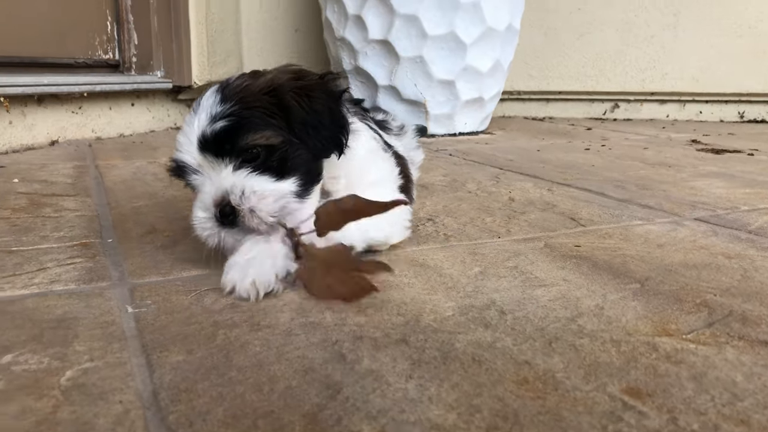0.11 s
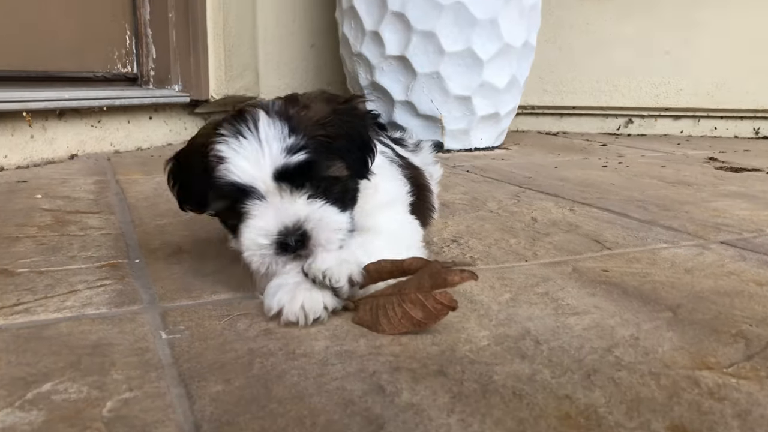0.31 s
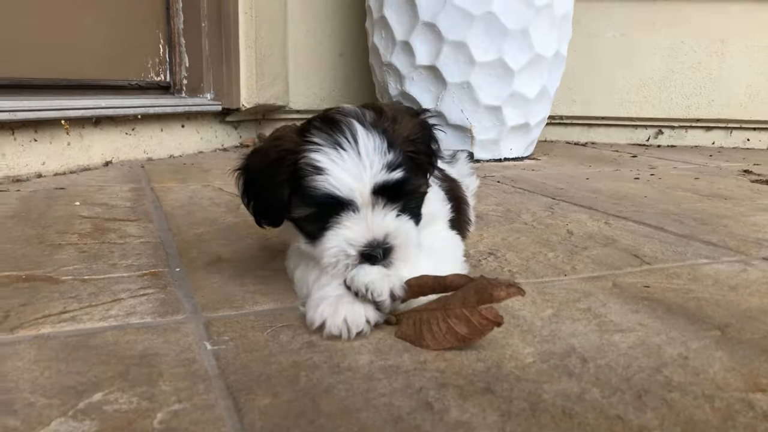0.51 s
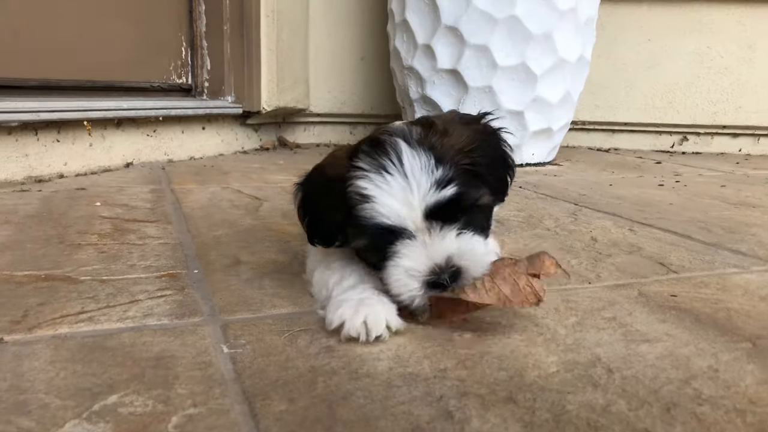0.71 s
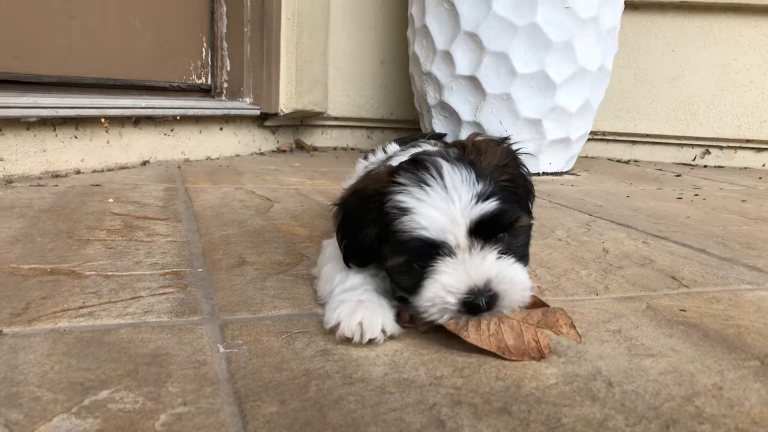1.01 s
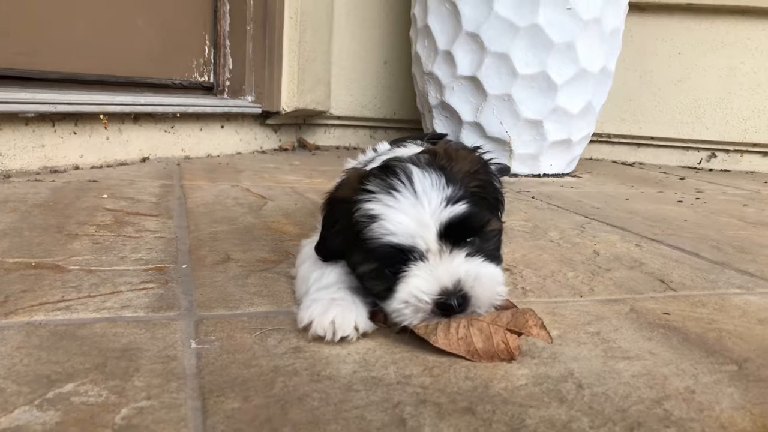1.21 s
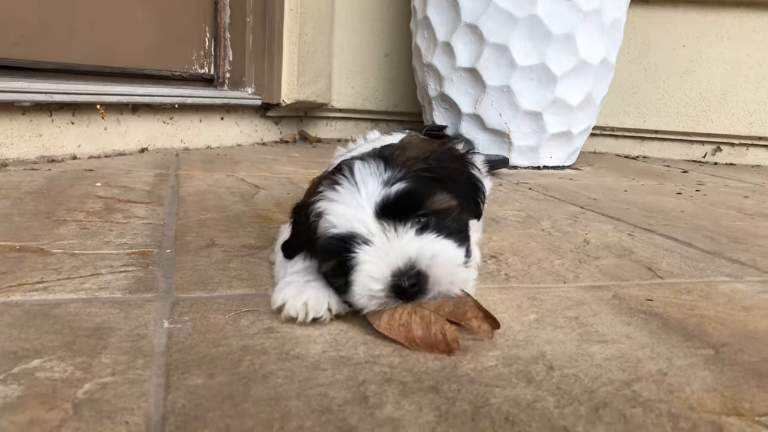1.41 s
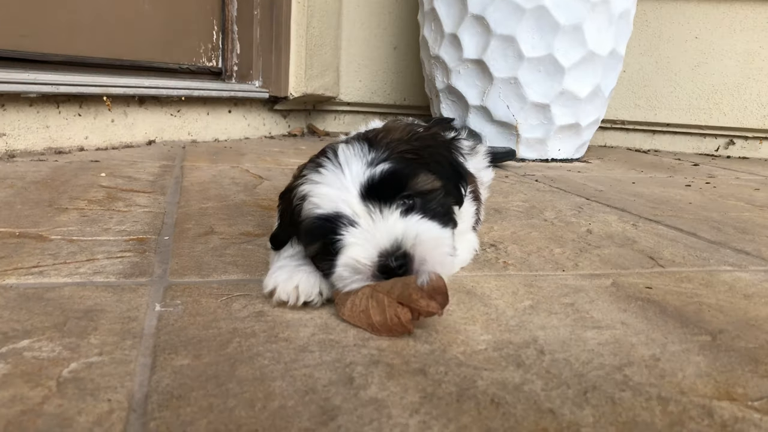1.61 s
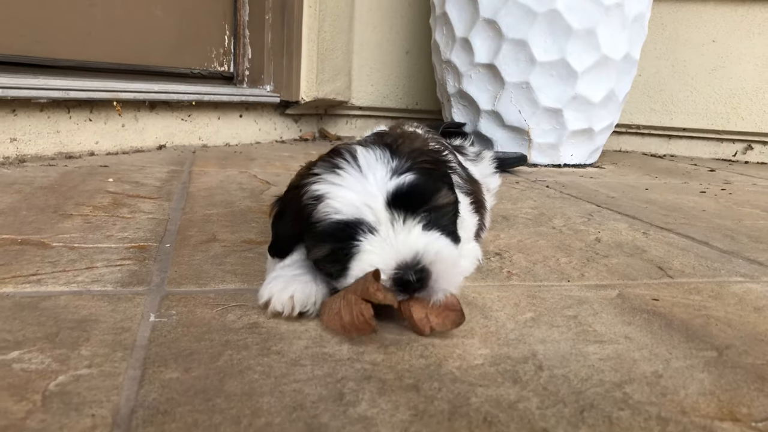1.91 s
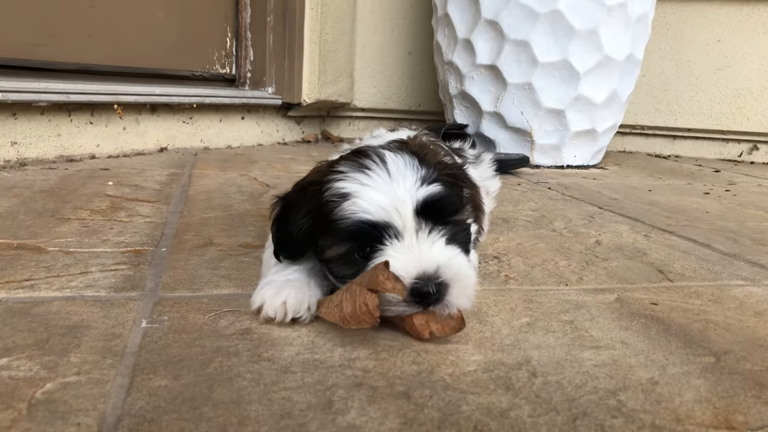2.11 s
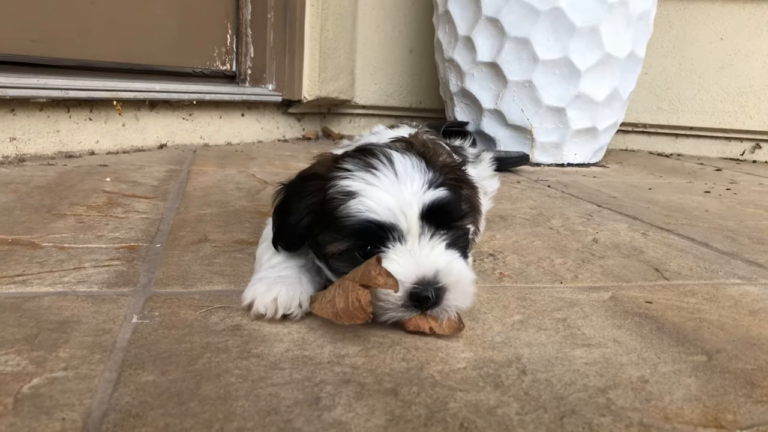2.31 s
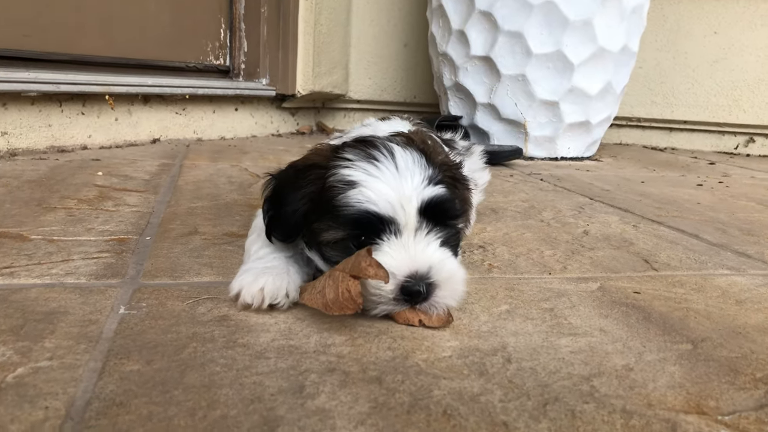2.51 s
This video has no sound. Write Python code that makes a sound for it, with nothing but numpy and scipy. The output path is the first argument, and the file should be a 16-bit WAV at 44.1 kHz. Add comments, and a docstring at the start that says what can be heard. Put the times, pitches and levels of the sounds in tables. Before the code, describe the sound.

Close-up brittle leaf crunches come in bursts, busiest midway, then softer tooth nibbles and a late sharp tick; short porch echo, faint bird chirps, and constant outdoor rumble and hiss with a thin high whine.

```python
"""A puppy chews a dry leaf on a stone porch, heard close up, over low rumble and a high hiss with a fine whine.
First the leaf snaps in clusters (noise bursts through brief resonances), with swells of rustle (rough grains)
and hollow rib knocks (decaying sines). Small crinkles join while the jaw works, then distant bird whistles
(gliding sines). Soft mouth ticks and teeth catching on the leaf (shorter bursts) come in towards the end.
The close sounds get a short echo from floor and wall; the bird has its own; a low-pass shuts off the top.
"""
import sys
import numpy as np
from scipy import signal
from scipy.fft import rfft, irfft, next_fast_len
from scipy.io import wavfile
from scipy.ndimage import uniform_filter1d

SR = 44100
rng = np.random.default_rng(int(sys.argv[2]) if len(sys.argv) > 2 else 0)


def store_pcm(level_fs):
    """Save levels as 16-bit WAV."""
    pcm = np.round(np.clip(level_fs, -1, 1) * 32767).astype(np.int16)
    wavfile.write(sys.argv[1], SR, np.atleast_2d(pcm).T)


N = 116865  # length in samples

LOW_HZ, MID_HZ, HIGH_HZ = 437, 2360, 5400  # lower edges of the three crack bands
LEVEL_WINDOW_S = 0.003  # crack and knock levels are the rms of their energy spread over this time


def undb(db):
    """Decibels to gain."""
    return 10 ** (np.asarray(db) / 20)


def unit(x):
    """Scale to unit energy."""
    return x / np.sqrt(np.sum(x ** 2) + 1e-18)


def level(x, db):
    """Scale to an rms level."""
    return unit(x) * np.sqrt(len(x)) * undb(db)


def add(out, start, x):
    """Mix a sound in at a time in seconds."""
    i = max(int(start * SR), 0)
    out[i:i + len(x)] += x[:max(len(out) - i, 0)]


def ring_down(t, t60):
    """Exponential decay that falls by 60 dB in t60 seconds."""
    return np.exp(-np.log(1000) * t / t60)


def colour(x, points):
    """Causal (minimum-phase) EQ through (f/Hz, level/dB) points, built by folding the cepstrum."""
    hz, db = np.array(points).T
    size = next_fast_len(len(x) + 4096)
    log_hz = np.log(np.fft.rfftfreq(size, 1 / SR) + 1)
    log_gain = np.interp(log_hz, np.log(hz), np.log(undb(db)))
    cepstrum = irfft(log_gain, size)
    cepstrum[1:size // 2] *= 2
    cepstrum[size // 2 + 1:] = 0
    return irfft(rfft(x, size) * np.exp(rfft(cepstrum)), size)[:len(x)]


WHINE_WAVER_DB, WHINE_WAVER_S = 2.5, 0.45  # spread of the drift, time between its knots


def waver(t):
    """Slow random drift of a level."""
    knots = np.arange(0, t[-1] + WHINE_WAVER_S, WHINE_WAVER_S)
    return undb(WHINE_WAVER_DB * np.interp(t, knots, rng.standard_normal(len(knots))))


# spectral shape of the outdoor rumble and hiss (f/Hz, relative level/dB)
AIR = [(20, -23), (50, -2.5), (130, -4.5), (220, -5), (400, -9), (650, -10.5), (1100, -21), (2200, -23),
       (4600, -27), (6200, -25), (11000, -18), (12500, -37.5), (15500, -36)]
AIR_DB = -51.5
# strongest lines of the whine, each drifting around its level (f/Hz, level/dB)
WHINE_LINES = [(6156, -67.5), (7098, -67), (7678, -66.5), (9625, -66)]
WHINE_SPACING_HZ, WHINE_LOW_HZ, WHINE_TOP_HZ = 71.7, 5440, 11100
WHINE_DB, WHINE_SCATTER_DB = -56.5, 2  # level of the whole comb, scale of its uneven lines


def background():
    """Steady rumble and hiss from shaped noise; the hiss holds a fine whine of closely spaced lines."""
    t = np.arange(N) / SR
    air = level(colour(rng.standard_normal(N), AIR), AIR_DB)
    hz = WHINE_SPACING_HZ * np.arange(1, 200)
    size = undb(WHINE_SCATTER_DB * rng.uniform(-0.52, 0.76, len(hz)))
    size = size * (hz > WHINE_LOW_HZ) * (hz < WHINE_TOP_HZ)
    lines = np.zeros(N // 2 + 1, complex)
    lines[np.round(hz * N / SR).astype(int)] = size * np.exp(2j * np.pi * rng.random(len(hz)))
    strong = np.zeros(N)
    for f, db in WHINE_LINES:
        amplitude = np.sqrt(2) * undb(db) * waver(t)
        strong += amplitude * np.sin(2 * np.pi * (f * t + rng.random()))
    return air + level(irfft(lines, N), WHINE_DB) + strong


# colour of a crack before its bands are levelled (f/Hz, relative level/dB)
CRACK_COLOUR = [(200, -2), (560, 2.5), (760, -3), (980, 1), (1500, 6), (3400, 3), (5200, -3.5), (7000, -2),
                (8200, -5), (9800, 1.5), (12500, -5), (15500, -4.5)]


def body(modes, ring_db, stretch):
    """Response of a thin object: the crack itself and its brief resonances, all shifted in pitch by stretch."""
    t = np.arange(1024) / SR
    ring = np.zeros(len(t))
    for hz, t60, db in modes:
        ring += undb(db) * np.cos(2 * np.pi * hz * stretch * t) * ring_down(t, t60)
    click = t == 0
    return colour(click + undb(ring_db) * unit(ring), CRACK_COLOUR)


CRACK_RISE_S, CRACK_PEAK_S = 0.00051, 0.00072  # rise time constant; onset to strongest fracture
LEAD_S = 0.003  # room for the rise ahead of the onset
FIBRE_SCATTER_DB, PITCH_SPREAD = 4.5, 0.08  # spread of fibre strength; of log resonance pitch


def cracks(rows, decay_s, modes, ring_db):
    """A quick avalanche of breaking fibres; resonances shift at random in pitch from crack to crack."""
    out = np.zeros(N)
    t = np.arange(1024) / SR - LEAD_S - CRACK_PEAK_S
    bands = [signal.butter(2, [LOW_HZ, MID_HZ], "band", fs=SR, output="sos"),
             signal.butter(3, [MID_HZ, HIGH_HZ], "band", fs=SR, output="sos"),
             signal.butter(4, HIGH_HZ, "high", fs=SR, output="sos")]
    envelope = np.exp(-np.maximum(-t / CRACK_RISE_S, t / decay_s))
    for start, *band_db in rows:
        push, size = rng.standard_normal((2, len(t)))
        response = body(modes, ring_db, np.exp(PITCH_SPREAD * rng.standard_normal()))
        fibres = push * undb(FIBRE_SCATTER_DB * size) * envelope
        burst = signal.fftconvolve(fibres, response)[:len(t)]
        parts = [undb(db) * unit(signal.sosfilt(band, burst)) for band, db in zip(bands, band_db)]
        add(out, start - LEAD_S, np.sqrt(LEVEL_WINDOW_S * SR) * sum(parts))
    return out


# brittle leaf snaps (t/s, low band level/dB, middle band level/dB, high band level/dB)
SNAPS = [(0.0554, -49.5, -44, -47), (0.2381, -31, -31.5, -33), (0.239, -32.5, -27.5, -27.5),
         (0.2554, -47, -18, -21.5), (0.2574, -34, -21, -24), (0.2594, -29, -26, -22),
         (0.2878, -39.5, -39, -57), (0.3176, -32.5, -37.5, -56), (0.7363, -30.5, -27.5, -36.5),
         (0.7471, -30, -56, -39), (0.7588, -42, -41, -45), (0.7878, -54, -47, -30.5),
         (0.8282, -41, -58, -64), (0.957, -47, -49, -48), (0.971, -36.5, -34, -39), (0.9908, -43, -30, -29),
         (0.9998, -30.5, -33, -28), (1.0046, -34, -26.5, -30.5), (1.0113, -29, -21, -17),
         (1.0585, -40.5, -30, -36), (1.1666, -42, -65, -70), (1.2135, -63, -45, -41.5),
         (1.2744, -43.5, -37, -37.5), (1.2994, -38.5, -33.5, -37), (1.3051, -37, -36, -44),
         (1.3359, -41, -29.5, -26), (1.3376, -37.5, -31.5, -31), (1.3506, -38, -37, -26.5),
         (1.354, -38, -25, -26.5), (1.356, -41, -26.5, -42), (1.3652, -53, -33, -37),
         (1.3904, -36.5, -23, -21.5), (1.3934, -34.5, -21, -37), (1.4097, -44, -29.5, -31),
         (1.4168, -35.5, -42, -43), (1.4263, -36, -28.5, -29.5), (1.4438, -46, -49, -56),
         (1.4583, -26, -18.5, -20), (1.46, -27.5, -35, -40), (1.4722, -56, -28, -36),
         (1.4861, -42, -25.5, -24), (1.4963, -34, -26, -29), (1.5273, -25.5, -32, -29.5),
         (1.5309, -45, -28, -31), (1.6147, -36, -28, -30)]
# leaf resonances before the random pitch shift (f/Hz, t60/s, relative level/dB)
LEAF = [(980, 0.008, -20), (1400, 0.031, -10), (2280, 0.0089, -9), (3330, 0.0051, -8.5), (3660, 0.011, 2.5),
        (7330, 0.0041, 2)]
SNAP_DECAY_S = 0.0013  # time constant


def snaps():
    """The brittle leaf breaks: crack bursts ringing through the leaf's own resonances."""
    return cracks(SNAPS, SNAP_DECAY_S, LEAF, ring_db=-6.0)


# swells as the leaf bends or scrapes on the stone
# (peak t/s, rise time constant/s, decay time constant/s, level at the peak before treble gain/dB, treble gain/dB)
RUSTLES = [(0.263, 0.0055, 0.0076, -28, 1.5), (0.334, 0.01, 0.013, -33.5, 7),
           (.685, 0.008, 0.0058, -40.5, 4), (0.711, 0.003, 0.0051, -46, 14),
           (0.749, 0.0042, 0.0062, -35.5, 1), (0.794, 0.0041, 0.0019, -32, 10),
           (0.829, 0.0095, .005, -39.5, -22), (1.015, 0.01, 0.014, -39, 11),
           (1.347, 0.0057, 0.024, -36.5, 9), (1.484, 0.018, 0.01, -36.5, 12),
           (1.534, 0.013, 0.0062, -42, 7), (1.603, 0.0016, 0.015, -37.5, 7),
           (1.673, 0.0065, 0.0059, -37.5, 5.5), (2.042, 0.019, 0.014, -37.5, 1),
           (2.21, 0.0059, 0.0083, -43, 6), (2.335, 0.0091, 0.032, -63, 24)]
# colour of the rustle (f/Hz, relative level/dB)
RUSTLE_COLOUR = [(100, -15), (760, -3), (980, 2), (1600, 2), (2500, 0.5), (3400, -0.5), (5200, -8.5),
                 (7000, -12), (10000, -14), (15500, -22.5)]
RUSTLE_SCATTER_DB = 5.5  # spread of grain strength


def rustle():
    """Dense tiny fractures swell and die away as the leaf is bent and dragged."""
    t = np.arange(N) / SR
    size = np.repeat(rng.standard_normal(N // 24 + 1), 24)[:N]  # each strength held for 24 samples
    rough = rng.standard_normal(N) * undb(RUSTLE_SCATTER_DB * size)
    grains = level(colour(rough, RUSTLE_COLOUR), 0)
    dull = signal.sosfiltfilt(signal.butter(2, HIGH_HZ, fs=SR, output="sos"), grains)
    out = np.zeros(N)
    for peak, rise, decay, db, treble_db in RUSTLES:
        envelope = np.exp(-np.maximum((peak - t) / rise, (t - peak) / decay))
        out += undb(db) * envelope * (dull + undb(treble_db) * (grains - dull))
    return out


# a stiff rib of the leaf gives way with a hollow knock (t/s, f/Hz, level/dB)
KNOCKS = [(0.2574, 594, -32), (1.528, 980, -41.5), (2.3128, 1243, -32)]
KNOCK_T60_S = 0.021


def knocks():
    """A rib that gives way rings briefly at one pitch."""
    out, t = np.zeros(N), np.arange(N) / SR
    for start, hz, db in KNOCKS:
        ring = np.sin(2 * np.pi * hz * t) * ring_down(t, KNOCK_T60_S)
        add(out, start, np.sqrt(LEVEL_WINDOW_S * SR) * undb(db) * unit(ring))
    return out


# spells in which the jaw works (start t/s, end t/s)
CHEWS = [(.68, .83), (1.16, 1.55), (1.6, 1.69), (1.94, 2.08)]
# resonances of the mouth closed on the leaf before the random pitch shift, also used by ticks and bites
# (f/Hz, t60/s, relative level/dB)
MOUTH = [(1420, 0.011, -3), (3430, 0.01, -7)]
CRINKLES_PER_S, CRINKLE_DB, CRINKLE_SPREAD_DB = 55, -44, 2.5
CRINKLE_EDGE_DB = -9.5  # low and high bands against the middle


def crinkles():
    """Small stray cracks at random moments while the jaw works, each with its own colour."""
    slots = np.arange(0, N / SR, LEVEL_WINDOW_S)
    chance, scatter = rng.random((len(slots), 2)), rng.standard_normal((len(slots), 4))
    chewing = sum((slots > start) & (slots < end) for start, end in CHEWS)
    happens = chance[:, 0] < chewing * CRINKLES_PER_S * LEVEL_WINDOW_S
    # one draw shared by all bands plus one per band
    spread_db = CRINKLE_SPREAD_DB * (scatter[:, :1] + scatter[:, 1:]) / np.sqrt(2)
    band_db = CRINKLE_DB + CRINKLE_EDGE_DB * np.array([1, 0, 1]) + spread_db
    times = slots + chance[:, 1] * LEVEL_WINDOW_S
    rows = np.column_stack([times, band_db])[happens]
    return cracks(rows, SNAP_DECAY_S, MOUTH, ring_db=-15)


# bird whistles (start t/s, length/s, first f/Hz, f it settles towards/Hz, level at the crest/dB, flutter/Hz)
WHISTLES = [(0.811, .38, 3464, 3685, -55, 14), (2.044, 0.096, 4820, 4750, -52.5, 100),
            (2.212, 0.107, 4440, 4220, -47.5, 35), (2.3, .21, 3380, 3110, -61, 42)]
GLIDE_RATE, SWELL_SKEW = 2.5, 0.6  # glide decay per whistle length; below 1 the swell crests early
FLUTTER_S = 0.004  # smoothing of the pitch flutter
BIRD_ECHO_DB, BIRD_T60_S = -10, 0.22


def bird():
    """Distant whistles swell early and fade slowly; each glides, flutters a little and levels off."""
    out, t = np.zeros(N), np.arange(SR) / SR
    for start, length, first_hz, last_hz, db, flutter_hz in WHISTLES:
        u = np.linspace(0, 1, int(length * SR))
        smooth = uniform_filter1d(rng.standard_normal(SR), int(FLUTTER_S * SR))
        flutter = level(smooth, 0)[:len(u)]
        hz = last_hz + (first_hz - last_hz) * np.exp(-GLIDE_RATE * u) + flutter_hz * flutter
        swell = np.sin(np.pi * u ** SWELL_SKEW) ** 2
        add(out, start, np.sqrt(2) * undb(db) * swell * np.sin(2 * np.pi * np.cumsum(hz) / SR))
    tail = unit(rng.standard_normal(SR) * ring_down(t, BIRD_T60_S))
    return out + undb(BIRD_ECHO_DB) * signal.fftconvolve(out, tail)[:N]


def with_middle(rows, middle_db):
    """Give each (t/s, low/dB, high/dB) row a middle band offset from the mean of the other two."""
    return [(start, low, (low + high) / 2 + middle_db, high) for start, low, high in rows]


# sharp mouth ticks, plus one leaf pop at 2.3118 s beside the rib knock (t/s, low band level/dB, high band
# level/dB)
TICKS = [(1.233, -45.5, -41.5), (1.7431, -46, -39), (1.7484, -49, -37), (1.7821, -56.5, -38.5),
         (1.8855, -46.5, -46.5), (2.3118, -37, -24), (2.3754, -47, -28.5), (2.3773, -55, -42),
         (2.3877, -60, -32), (2.3971, -51, -38), (2.429, -58, -40), (2.4421, -67, -41.5)]
TICK_DECAY_S = 0.00034  # time constant


def ticks():
    """The mouth ticks and one leaf pop: very short bursts with little resonance."""
    return cracks(with_middle(TICKS, middle_db=1.5), TICK_DECAY_S, MOUTH, ring_db=-37)


# teeth catching on the leaf (t/s, low band level/dB, high band level/dB)
BITES = [(1.9492, -40.5, -55), (1.9526, -37, -43), (1.9645, -36.5, -44.5), (1.9851, -37, -56),
         (2.0057, -42, -35.5), (2.0099, -34.5, -46), (2.0169, -33.5, -29), (2.0231, -35, -32),
         (2.0283, -33, -51), (2.0325, -32, -34), (2.0373, -35, -41), (2.0534, -36.5, -45),
         (2.0588, -40, -40), (2.0665, -34, -44), (2.0917, -41.5, -39)]
BITE_DECAY_S = 0.00033  # time constant


def bites():
    """Teeth catch on the leaf: very short bursts coloured by the closed mouth."""
    return cracks(with_middle(BITES, middle_db=-1.5), BITE_DECAY_S, MOUTH, ring_db=-9)


ECHO_S, ECHO_DB = 0.003, -9  # early scatter
PORCH_T60_S, PORCH_DB = 0.2, -14.5  # tail, level before its colour


def porch(x):
    """Early scatter from the floor and a short tail from the wall, heavier in the lows."""
    t = np.arange(SR // 4) / SR
    early = unit(rng.standard_normal(len(t)) * t * np.exp(-t / (ECHO_S / 2)))
    late = rng.standard_normal(len(t)) * (1 - np.exp(-t / ECHO_S)) * ring_down(t, PORCH_T60_S)
    late = colour(unit(late), [(300, 7), (4000, -1), (8000, -3), (15000, 3)])
    return x + signal.fftconvolve(x, undb(ECHO_DB) * early + undb(PORCH_DB) * late)[:N]


def scene():
    """The chewing puppy on the porch, with the bird and the background behind it."""
    outdoors = background() + bird()
    breaking = snaps() + bites() + ticks()
    chewing = breaking + knocks() + rustle() + crinkles()
    return (porch(chewing) + outdoors)[None]


TOP_HZ = 15900


def record(dry):
    """A steep elliptic low-pass cuts the top."""
    return signal.sosfilt(signal.ellip(8, 0.2, 70, TOP_HZ, fs=SR, output="sos"), dry)


dry = scene()
out = record(dry)
store_pcm(out)
```